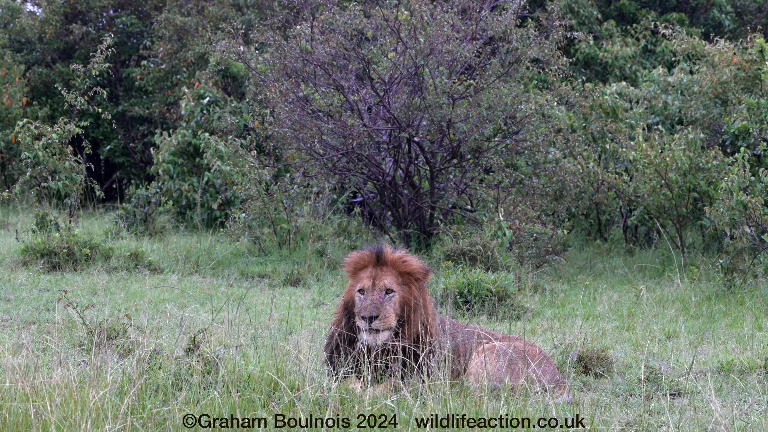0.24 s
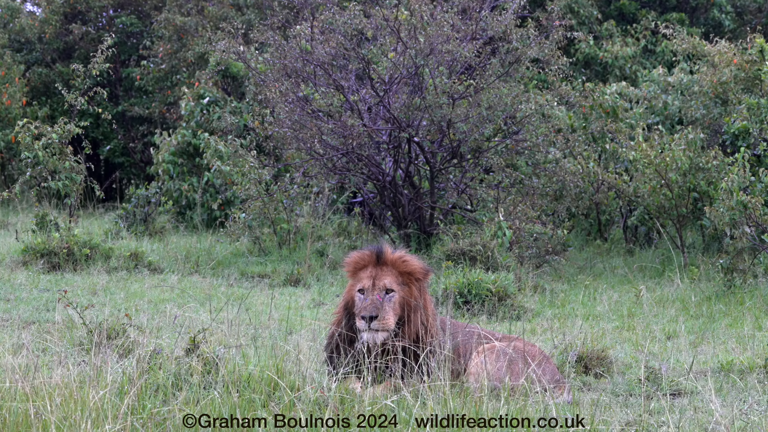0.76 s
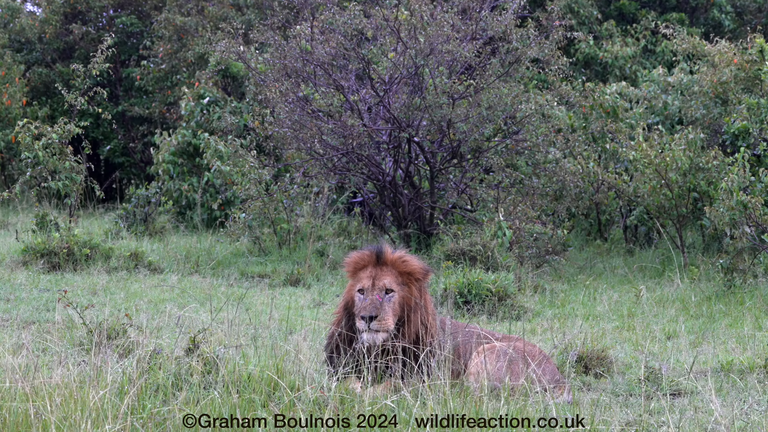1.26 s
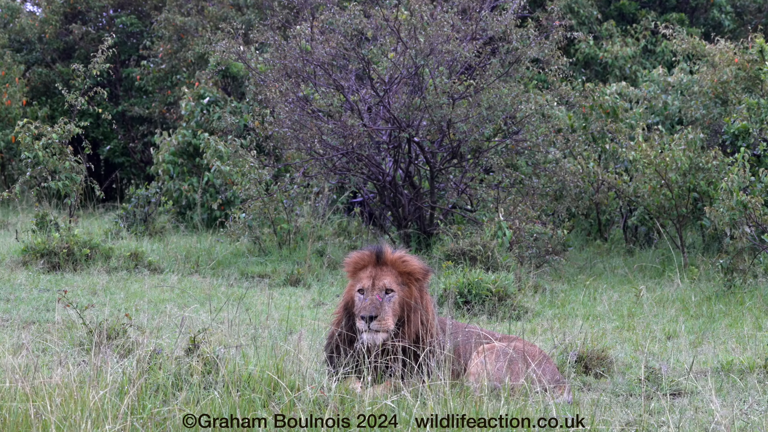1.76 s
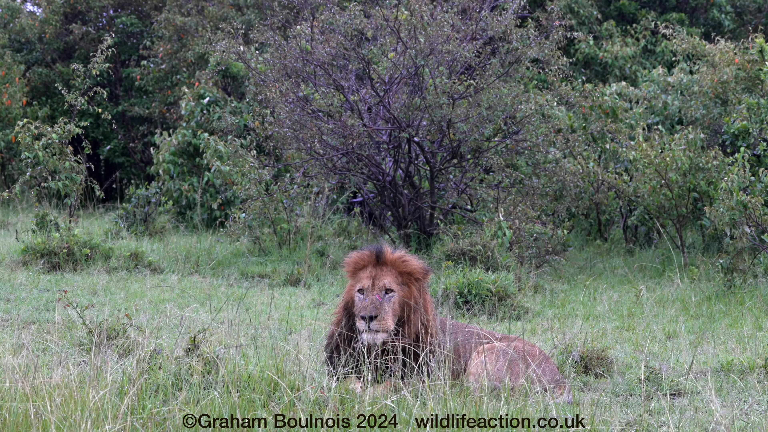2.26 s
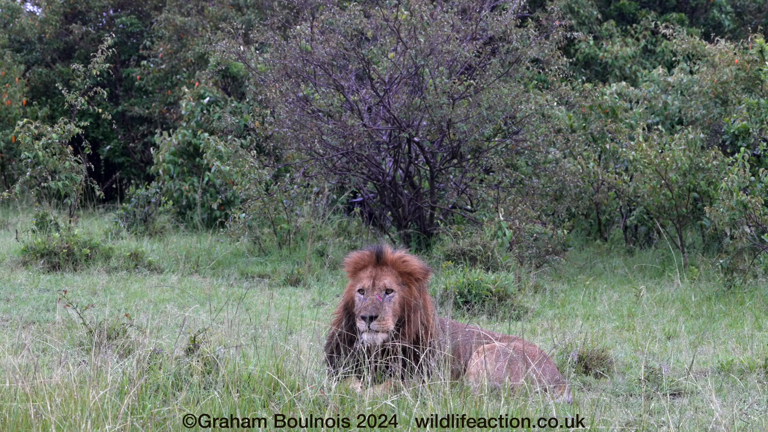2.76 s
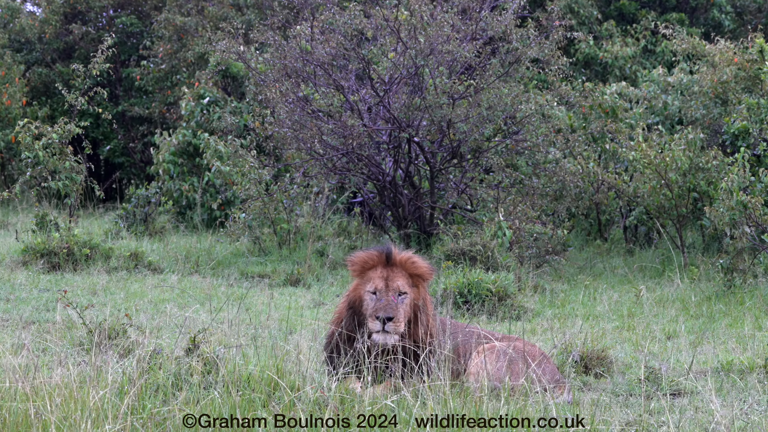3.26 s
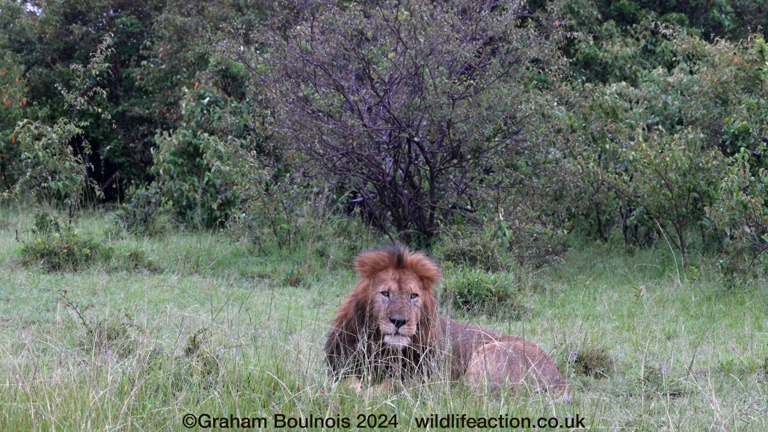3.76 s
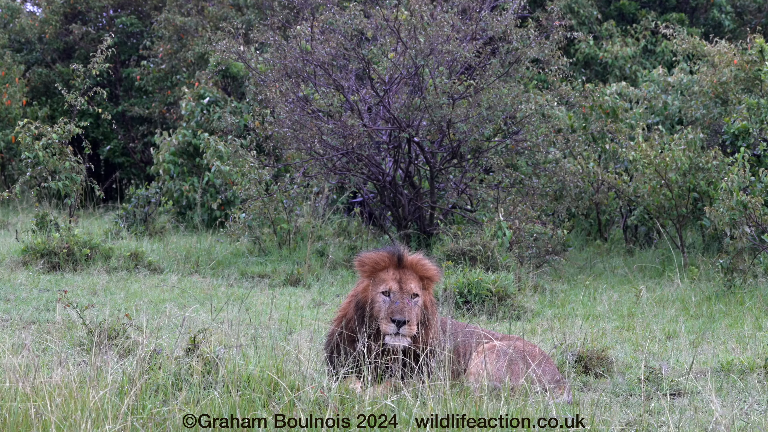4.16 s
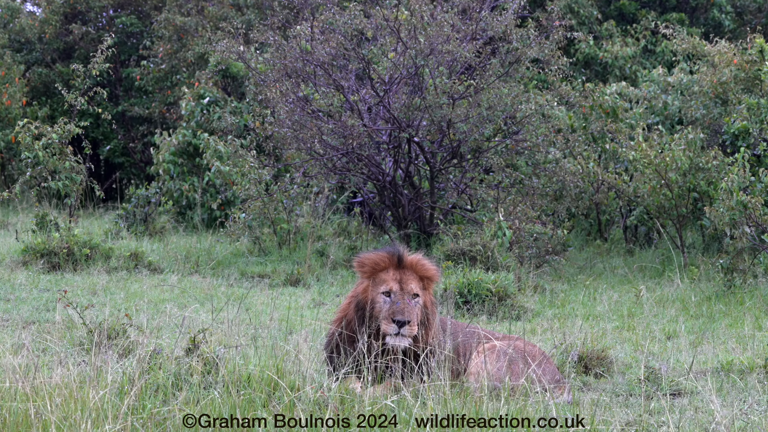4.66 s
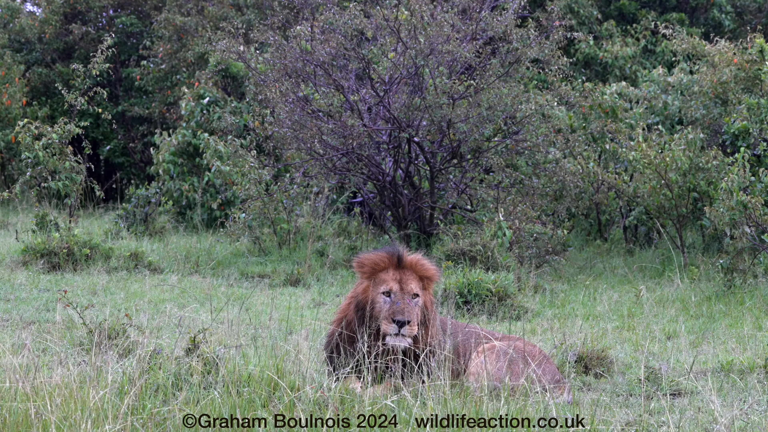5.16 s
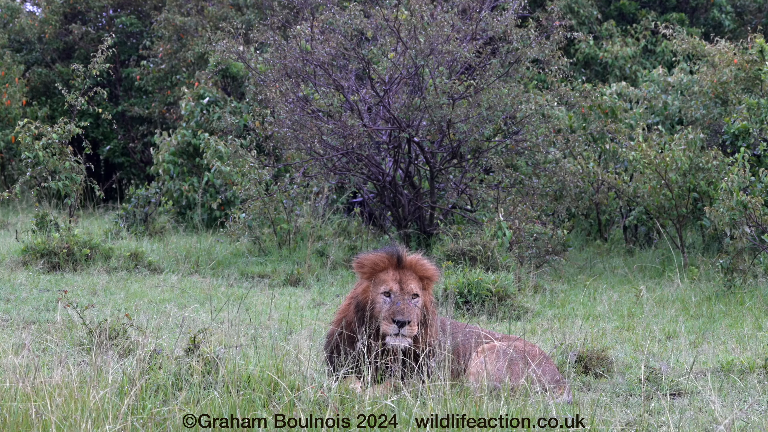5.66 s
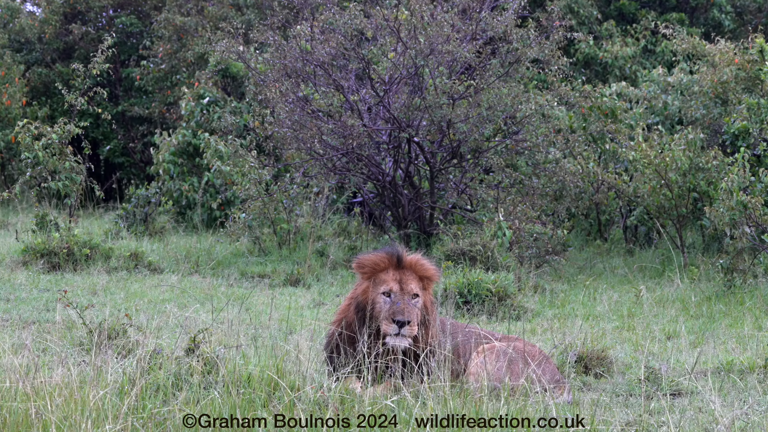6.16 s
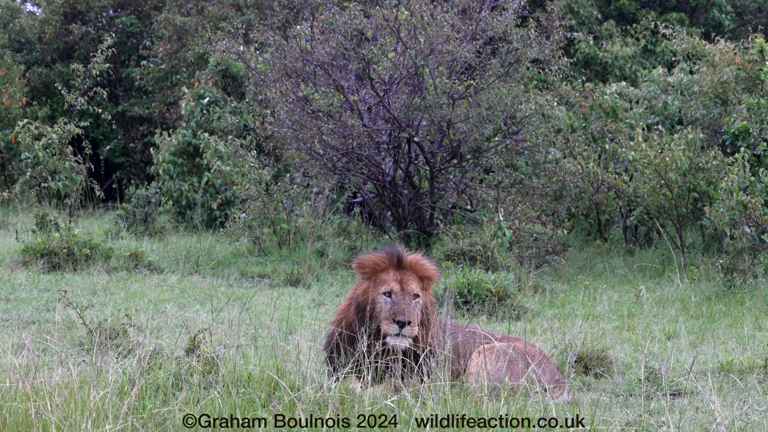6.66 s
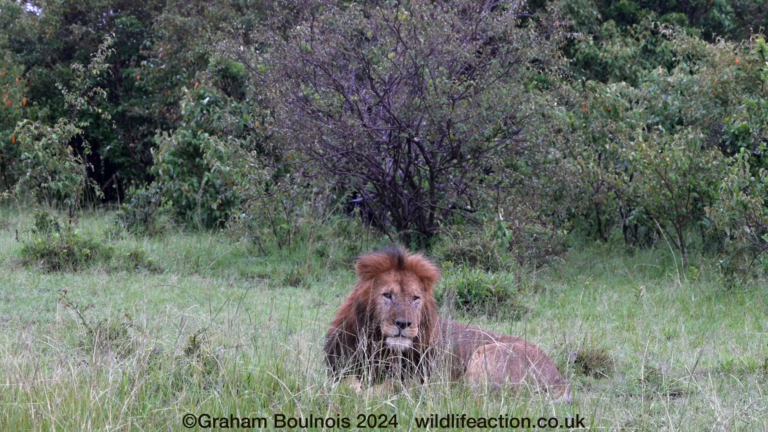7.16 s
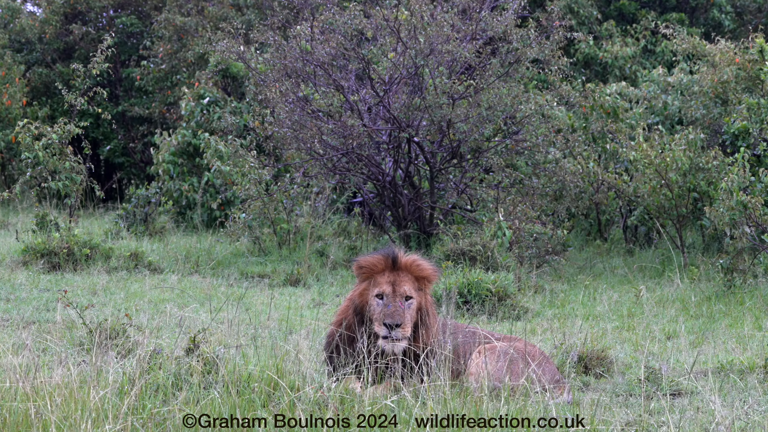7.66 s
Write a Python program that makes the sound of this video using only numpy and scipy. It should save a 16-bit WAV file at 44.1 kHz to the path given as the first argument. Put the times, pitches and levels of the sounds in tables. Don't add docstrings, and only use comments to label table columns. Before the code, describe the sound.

Outdoors beside dense bush, light rain taps leaves and plops close to the microphone. A male lion calls in deep, nearly pure notes that swell, drop in pitch and fray into throaty growling. Gaps shorten as roars become grunts, then a closing-mouth groan pulses away. Dull low echoes hang behind. Faint bird chirps, far coos and a late frog trill sit underneath. All of it is on the left channel, with only thin hiss on the right.

```python
import sys
import numpy as np
from scipy import signal
from scipy.fft import rfft, irfft
from scipy.io import wavfile
from scipy.ndimage import uniform_filter1d

SR = 44100
rng = np.random.default_rng(int(sys.argv[2]) if len(sys.argv) > 2 else 0)


def ratio(d):
    e = np.asarray(d, float) / 20
    return 10 ** e


def int16_out(signal):
    q = np.round(np.clip(np.atleast_2d(signal).T, -1, 1) * 32767)
    wavfile.write(sys.argv[1], SR, q.astype(np.int16))


N = 349255
LEAD = SR

# (frequency [Hz], density [dB per Hz])
WASH_SPECTRUM = [(15, -64), (25, -37), (49, -6.5), (96, -2), (144, -8.5), (160, -23.5), (179, -0.5),
                 (240, -12.5), (369, -12.5), (616, -15.5), (1760, -17.5), (4060, -27.5), (7340, -35),
                 (15600, -47)]
WASH_DB = -52.5
# (time [s], level [dB])
PATTER_LEVEL = [(0.0, -52.5), (1.17, -55.5), (1.56, -53.5), (2.16, -57.5), (2.98, -50.5), (3.46, -54.5),
                (3.68, -55), (4.39, -52), (4.63, -53), (4.76, -64.5), (5.271, -47), (5.6, -59), (6.13, -56),
                (6.64, -54), (6.79, -48.5), (7.92, -58.5)]
# (frequency [Hz], density [dB per Hz])
PATTER_SPECTRUM = [(290, -35), (500, -3.5), (610, 4), (1240, -7), (1750, 0.5), (3460, -5.5), (3990, -8.5),
                   (9930, -36), (15000, -28)]
# (time [s], peak level [dB], ring frequency [Hz])
NEAR_DROPS = [(0.388, -44, 3300), (0.5447, -39.5, 1450), (0.68, -42, 2600), (0.9606, -43.5, 1730),
              (1.1355, -40.5, 1430), (1.5628, -44.5, 2280), (1.7015, -38.5, 1790), (1.998, -41.5, 1740),
              (2.0718, -42, 1790), (2.347, -37.5, 1750), (2.4652, -35, 1710), (2.5902, -42.5, 1580),
              (2.863, -44.5, 1850), (2.8963, -39, 1570), (3.3, -37.5, 1318), (3.557, -42, 1530),
              (4.2768, -42, 1270), (4.9675, -39.5, 1840), (4.9887, -40.5, 1890), (5.3491, -42, 1610),
              (5.4997, -42.5, 1751), (5.754, -43.5, 1530), (5.8078, -43.5, 1980), (5.852, -42.5, 1910),
              (6.1155, -39.5, 1940), (6.404, -44.5, 1330), (6.699, -39.5, 2100), (7.0843, -41, 2190),
              (7.742, -39.5, 1810),
              (0.126, -50, 635), (0.81, -48, 781), (1.204, -48, 970), (2.189, -39.5, 970),
               (3.613, -43, 931), (3.832, -39.5, 1170), (4.133, -45, 640), (5.945, -38.5, 950),
               (6.285, -40, 1070), (7.54, -42, 883)]
# (time [s], peak level [dB])
TICKS = [(0.065, -60.5), (0.386, -73), (0.411, -63.5), (0.6485, -57.5), (0.66, -56.5), (0.7823, -63),
         (1.088, -62.5), (1.5047, -60), (2.352, -66), (2.6737, -62.5), (2.8426, -56), (2.9475, -61.5),
         (3.3037, -57), (3.6223, -64.5), (3.8945, -63), (3.971, -61.5), (4.3417, -62), (4.418, -59.5),
         (4.435, -60), (4.487, -62), (5.9379, -60.5), (6.4882, -67), (6.629, -59), (6.7216, -60.5),
         (6.739, -59.5), (7.1397, -64)]
# (start [s], length [s], first frequency [Hz], last frequency [Hz], level
# [dB])
BIRDS = [(1.379, 0.059, 4600, 3370, -66), (1.445, .035, 3300, 2480, -60.5), (1.475, .025, 3700, 3360, -59),
         (1.492, .03, 2870, 2790, -56.5), (1.555, 0.022, 3100, 2250, -59.5), (1.82, 0.073, 4400, 4130, -79),
         (2.1, .05, 4450, 4440, -78), (3.46, 0.027, 5300, 2970, -60.5), (3.466, 0.063, 6100, 5270, -73),
         (3.495, 0.019, 5380, 4270, -57), (3.52, 0.023, 5040, 4200, -66), (1.41, 0.031, 4000, 3420, -58.5),
         (3.579, 0.15, 4850, 4150, -73), (3.696, 0.041, 4080, 3870, -63), (3.85, .14, 4030, 4180, -68),
         (3.986, 0.099, 4180, 3450, -63), (4.08, 0.04, 3760, 3490, -70), (4.538, .06, 5700, 5300, -80),
         (4.586, 0.07, 5350, 4400, -69), (4.932, 0.088, 5410, 4470, -66.5), (6.63, .07, 3370, 2760, -66),
         (6.98, .06, 3570, 2990, -64), (7.016, 0.025, 4300, 4150, -58.5)]
# (start [s], length [s], first frequency [Hz], last frequency [Hz], level [dB])
DOVES = [
    (1.129, 0.085, 524, 533, -70),
    (3.73, 0.058, 708, 687, -64),
    (6.12, 0.092, 370, 365, -67),
]
# (time [s], frequency [Hz], level [dB])
FROG = [
    (6.3, 2290, -72),
    (6.4, 2220, -62),
    (6.88, 2157, -56.5),
    (6.99, 2160, -80),
    (7.1, 2190, -79),
    (7.3, 2214, -73),
    (7.45, 2190, -65),
]
# (start [s], hold [s], release [s], note level at opening [dB], growl level at opening [dB])
ROARS = [
    (-.57, .44, 0.33, -28, -48),
    (1.225, .44, .28, -31.5, -48),
    (2.825, 0.33, 0.27, -28, -40),
    (4.095, 0.14, 0.29, -26.5, -38.5),
    (5.196, .135, .29, -25.5, -40),
    (6.291, 0.1, 0.29, -26, -42),
]
ROUGHNESS = [(0, .75), (.22, .92), (.5, .97), (.66, 1), (1, 1)]
CLEAR_ROUGHNESS = [(0, .12), (.19, .15), (.26, .85), (.6, .95), (.72, 1), (1, 1)]
# (multiple of the note [1], level [dB])
OVERTONES = [(2, 1), (3, 3.5), (4, -5.5), (5, -1.5), (6, -16)]
# (frequency [Hz], width [Hz], level [dB])
THROAT = [(257.3, 15.4, 2.5), (370, 34.3, -3), (432.5, 40, -1.5), (500, 60, -8.5), (572.2, 32, -4),
          (635, 31, -7.5), (754.4, 35.5, -11), (837.7, 34.7, -11), (973, 58, -19)]
# (time [s], level [dB], frequency [Hz])
FLARES = [(0.052, -37, 510), (0.148, -46, 390), (0.072, -42.5, 155.8), (1.825, -49, 849), (1.917, -45, 480),
          (1.949, -49, 150.4), (1.969, -48, 452), (3.272, -42.5, 513), (3.354, -49.5, 499),
          (3.354, -36, 152), (3.418, -44, 475), (3.423, -48.5, 153), (4.394, -36, 145.9), (4.419, -39, 389),
          (4.45, -37.5, 144.5), (4.493, -48.5, 477), (6.524, -45, 526), (6.571, -32, 169)]
# (time [s], frequency [Hz], level [dB])
WHINE = [
    (1.38, 440.6, -58),
    (1.45, 472.5, -42.5),
    (1.55, 477, -38.5),
    (1.66, 471.5, -35.5),
    (1.72, 438, -44),
    (1.76, 408, -42),
]
# (time [s], level [dB])
GROAN = [
    (6.62, -50.5),
    (6.694, -46),
    (6.818, -38.5),
    (6.85, -43.5),
    (6.964, -44.5),
    (6.998, -50),
    (7.036, -47),
    (7.378, -50),
    (7.5, -66.5),
]
# (time [s], low [Hz], middle [Hz], high [Hz])
MOUTH = [
    (6.6, 198, 633, 1040),
    (6.8, 215, 599, 912),
    (7.001, 201.4, 445, 796),
    (7.04, 185, 500, 833),
    (7.5, 90, 500, 715),
]
# (time [s], level [dB], frequency [Hz], half length [s])
THROBS = [(7.065, -42.5, 347, 0.025), (7.105, -39, 342.4, 0.013), (7.142, -36.5, 324.3, 0.018),
          (7.178, -32, 333, 0.011), (7.199, -35, 323, 0.0091), (7.214, -42, 350.6, .014),
          (7.252, -32, 351, 0.026), (7.314, -29.5, 331.7, 0.032), (7.37, -35.5, 333, 0.016),
          (7.387, -37.5, 338.5, 0.019), (7.448, -44, 327, 0.023)]

SNAP_DB, SNAP_S = -11.5, 0.0082
CRACKLE_PER_S, CRACKLE_DB, CRACKLE_S = 45, -60, 0.0044
NOTE_PEAK, NOTE_ENDS_DB = .6, 2
WAVER_DB, WAVER_HZ = 3, 7.9
FLARE_S = 0.019
RISE_S, RISE_DB, RISE_BEND = .09, 45, 1.7
PITCH_HZ, SCOOP, SCOOP_S, SAG, SAG_S = 178.43, .22, .045, .16, .045
SCOOP_PER_HOLD = .1
STRAIN, SNAPPED, FRAYED = .16, .65, .85
BREAK_DB, NOTE_FALL_DB, NOTE_BEND = -28.5, 38, 1.18
GROWL_DB, GROWL_RISE_DB, GROWL_FALL_DB, GROWL_BEND = -38, 30, 35, 2.45
CHEST_DB, CHEST_LIFT_DB, CHEST_LEAD_S, CHEST_FALL_DB = -51, 20.5, 0.083, 12
OPEN_HZ, SHUT_HZ = 200, 105
LOW_DB, HIGH_DB, RUMBLE_DB = -8.5, -11, -25.5
SHUT_LOW_DB, SHUT_RUMBLE_DB = 18, 28.5


def evened(x):
    return x / np.sqrt(np.mean(x ** 2) + 1e-20)


def read(points, hz):
    f, value = np.transpose(points)
    return np.interp(np.log(hz + 1), np.log(f + 1), value)


def add(mix, s, sound):
    part = mix[max(round(s * SR), 0):][:len(sound)]
    part += sound[:len(part)]


def columns(rows):
    s, *cols = np.transpose(rows)
    t = np.arange(s[0], s[-1], 1 / SR)
    edge = signal.windows.tukey(len(t), min(1, 600 / len(t)))
    return t, edge, [np.interp(t, s, c) for c in cols]


def tone(hz):
    return np.sin(2 * np.pi * np.cumsum(hz) / SR)


def decay(count, t60):
    return ratio(-60 * np.arange(count) / SR / t60)


def resonate(x, hz, width):
    turn = np.exp(2j * np.pi * np.cumsum(hz * np.ones(len(x))) / SR)
    r = np.exp(-np.pi * width / SR)
    return 2 * (turn * signal.lfilter([1 - r], [1, -r], x / turn + 1e-18)).real


def steady(x, s):
    size = round(s * SR)
    power = uniform_filter1d(uniform_filter1d(x ** 2, size), size)
    return x / np.sqrt(power + 1e-20)


def drift(count, hz):
    noise = rng.standard_normal(count + 4000)
    return evened(signal.lfilter(*signal.butter(2, hz, fs=SR), noise)[4000:])


def wash():
    frames, hz = N // 128 + 9, np.fft.rfftfreq(512, 1 / SR)
    a, b, patches = rng.standard_normal((frames, 257, 3)).T
    patches = evened(uniform_filter1d(uniform_filter1d(patches, 10, 0), 8, 1))
    flicker = evened(uniform_filter1d(rng.standard_normal(frames), 14))
    swing_db = (2.0 * patches + 3.4 * flicker) / (1 + (hz[:, None] / 6000) ** 4)
    fine = signal.istft((a + 1j * b) * ratio(swing_db), nperseg=512, noverlap=384)[1][:N]
    tilt = ratio(read(WASH_SPECTRUM, np.fft.rfftfreq(N, 1 / SR)))
    return ratio(WASH_DB - 7.5) * evened(irfft(rfft(fine) * tilt, N))


def crackle():
    size = ratio(4.0 * np.minimum(rng.exponential(1, N), 3)) * (rng.random(N) < CRACKLE_PER_S / SR)
    spray = rng.standard_normal(N) * signal.oaconvolve(size, decay(600, CRACKLE_S))[:N]
    return ratio(CRACKLE_DB) * resonate(resonate(spray, 3000, 4200), 3000, 5200)


def splash(hz, t60):
    t = np.arange(2200) / SR
    ring = np.sin(2 * np.pi * hz * (t - 12 * t ** 2)) * ratio(-60 * t / t60)
    ring *= 1 - np.exp(-(2.0 * t * hz) ** 2)
    spray = resonate(resonate(rng.standard_normal(len(t)), hz, 1.14 * hz), hz, 0.67 * hz)
    return ring + .5 * spray * ratio(-60 * t / 0.11) * (1 - np.exp(-(.5 * t * hz) ** 2))


def patter():
    size = ratio(3.66 * np.minimum(rng.exponential(1, N), 2.8)) * (rng.random(N) < 220 / SR)
    kind, out = rng.integers(0, 24, N), np.zeros(N)
    for k, hz in enumerate(np.geomspace(900, 6500, 24)):
        weight = np.sqrt(hz) * ratio(read(PATTER_SPECTRUM, hz))
        out += weight * signal.oaconvolve(size * (kind == k), splash(hz, 14 / hz))[:N]
    dull = signal.lfilter(*signal.butter(3, 7000, fs=SR), out)
    s, db = np.transpose(PATTER_LEVEL)
    return ratio(np.interp(np.arange(N) / SR, s, db) - 10.5) * evened(dull)


def rain():
    out = patter()
    for s, db, hz in NEAR_DROPS:
        add(out, s, ratio(db) * splash(hz, 0.0073))
        snap = resonate(rng.standard_normal(900), 0.93 * hz, 0.9 * hz)
        add(out, s, ratio(db + SNAP_DB) * decay(900, SNAP_S) * snap)
    for s, db in TICKS:
        tick = resonate(resonate(rng.standard_normal(900), 6500, 9700), 6500, 9700)
        add(out, s, ratio(db - 5) * tick * decay(900, 0.027))
    return out


def whistle(s, length, first_hz, last_hz, top_db):
    peak_hz = first_hz + NOTE_PEAK * (last_hz - first_hz)
    t, edge, (hz, db) = columns([(s, first_hz, top_db - NOTE_ENDS_DB),
                                 (s + NOTE_PEAK * length, peak_hz, top_db),
                                 (s + length, last_hz, top_db - NOTE_ENDS_DB / 2)])
    level = ratio(db + 0.5 + 3.3 * drift(len(t), 100))
    return t[0], edge * level * tone(hz * (1 + .012 * drift(len(t), 150)))


def frog():
    t, edge, (hz, db) = columns(FROG)
    trill = np.maximum(0.42 + np.sin(2 * np.pi * 24 * t + 1.6 * drift(len(t), 5.3)), 0)
    return t[0], edge * ratio(db - 3.0) * evened(trill) * tone(hz * (1 + 0.0171 * drift(len(t), 73)))


def whistlers():
    out = np.zeros(N)
    for s, sound in [whistle(*row) for row in BIRDS + DOVES] + [frog()]:
        add(out, s, sound)
    leaves = rng.standard_normal(6000) * decay(6000, 0.59)
    return out + ratio(-5.5) * signal.oaconvolve(out, leaves / np.linalg.norm(leaves))[:N]


def bush(voice):
    t = np.arange(2 * SR) / SR
    taps = rng.standard_normal(len(t)) * (rng.random(len(t)) < 90 / SR)
    tail = taps * (1 - np.exp(-(t / 0.32) ** 2)) * ratio(-60 * t / 3.4)
    tail = signal.lfilter(*signal.butter(3, 240, fs=SR), tail)
    tail /= abs(rfft(tail)[300:420]).mean()
    waver = ratio(-28 + WAVER_DB * drift(len(voice), WAVER_HZ))
    return waver * signal.fftconvolve(voice, tail)[:len(voice)]


def hoarse(breath, hz, width_hz):
    return steady(resonate(resonate(breath, hz, width_hz), hz, 3.5 * width_hz), 0.084)


def groan():
    t, edge, (mid_db,) = columns(GROAN)
    s, *bands = np.transpose(MOUTH)
    low, mid, high = (np.interp(t, s, c) for c in bands)
    shut = np.clip((OPEN_HZ - low) / (OPEN_HZ - SHUT_HZ), 0, 1)
    low_db = mid_db + LOW_DB + SHUT_LOW_DB * shut
    rumble_db = mid_db + RUMBLE_DB + SHUT_RUMBLE_DB * shut
    breath = rng.standard_normal(len(t)) * ratio(2.0 * drift(len(t), 41.1))
    middle = hoarse(breath, mid, 31) + 1.04 * hoarse(breath, .84 * mid, 30) + 0.39 * hoarse(breath, 331, 32)
    sound = ratio(low_db) * hoarse(breath, low, 21) + ratio(mid_db - 4.5) * middle
    sound += ratio(mid_db + HIGH_DB) * hoarse(breath, high, 55) + ratio(rumble_db) * hoarse(breath, 82, 30)
    return t[0], edge * sound


def whine():
    t, edge, (hz, db) = columns(WHINE)
    throb = 1 + 0.44 * tone(29 * (1 + 0.18 * drift(len(t), 8.9)))
    return t[0], edge * ratio(db + 2) * throb * tone(hz * (1 + 0.015 * drift(len(t), 25)))


def effort(start, hold, release, open_db, growl_open_db):
    t = np.arange(0, RISE_S + hold + release, 1 / SR)
    shy = np.clip(1 - t / RISE_S, 0, 1) ** RISE_BEND
    since = t - RISE_S - hold
    held, spent = np.clip(1 + since / hold, 0, 1), np.clip(since / release, 0, 1)
    slipped = np.clip(since / SAG_S, 0, 1)
    hz = PITCH_HZ * (1 - SCOOP * np.exp(-t / (SCOOP_S + SCOOP_PER_HOLD * hold)) - SAG * slipped)
    broken = STRAIN * held ** 3 + (SNAPPED - STRAIN) * slipped + (FRAYED - SNAPPED) * spent
    note_db = open_db + (BREAK_DB - open_db) * held
    note_db -= RISE_DB * shy + NOTE_FALL_DB * spent ** NOTE_BEND
    growl_db = growl_open_db + (GROWL_DB - growl_open_db) * held
    growl_db -= GROWL_RISE_DB * shy + GROWL_FALL_DB * spent ** GROWL_BEND
    chest_db = CHEST_DB - CHEST_LIFT_DB * np.clip(-since / CHEST_LEAD_S, 0, 1) - CHEST_FALL_DB * spent ** 3
    edge = signal.windows.tukey(len(t), 600 / len(t))
    return start + t, edge, (note_db, hz, growl_db, chest_db, broken)


def roar(row, roughness):
    t, edge, (note_db, hz, growl_db, chest_db, broken) = effort(*row)
    n = len(t)
    rough = np.interp(np.arange(n) / n, *np.transpose(roughness))
    turns = np.cumsum(hz * (1 + .006 * drift(n, 22))) / SR
    beat = tone((30 - 8.2 * broken) * (1 + 0.205 * drift(n, 11.2)))
    flutter = ratio((1.5 + 4.7 * broken) * beat)
    slaps = np.diff(np.floor(turns * 2), prepend=0) * rng.standard_normal(n)
    chaos = evened(flutter * (evened(slaps) + 1.27 * rng.standard_normal(n)))

    sine = np.sqrt(2) * np.sin(2 * np.pi * turns)
    ring = steady(resonate(resonate(chaos, hz, 85), hz, 87), 0.071)
    note = np.sqrt(1 - broken) * sine + np.sqrt(broken) * ring

    stack = evened(sum(ratio(db) * np.cos(2 * np.pi * k * turns) for k, db in OVERTONES))
    throat = np.zeros(n)
    for k, (f, width, db) in enumerate(THROAT):
        throat += (-1) ** k * ratio(db) * resonate(resonate(chaos, f, width), f, 1.74 * width)
    growl = np.sqrt(1 - rough) * stack + np.sqrt(rough) * steady(throat, 0.033)

    chest = steady(resonate(resonate(chaos, 82, 25), 74, 40), 0.021)
    return t[0], edge * (ratio(note_db) * note + ratio(growl_db) * growl + ratio(chest_db) * chest)


def lion():
    out = np.zeros(N + LEAD)
    folds = [ROUGHNESS, CLEAR_ROUGHNESS] + 4 * [ROUGHNESS]
    calls = [roar(*call) for call in zip(ROARS, folds)]
    for s, sound in calls + [whine(), groan()]:
        add(out, s + LEAD / SR, sound)
    t = np.arange(-2205, 2205) / SR
    for s, db, hz, half in [(*row, FLARE_S) for row in FLARES] + THROBS:
        burst = np.exp(-(t / half) ** 2) * np.sin(2 * np.pi * hz * (t + s))
        add(out, s + t[0] + LEAD / SR, ratio(db + 4.0) * burst)
    return out


def scene():
    voice = lion()
    heard = (voice + bush(voice))[LEAD:] + wash() + rain() + whistlers() + crackle()
    return np.array([2 * heard, 0 * heard])


def band_limit(x):
    return signal.sosfilt(signal.butter(12, 15730, fs=SR, output="sos"), x)


def record(dry):
    hiss = ratio(np.array([[-75], [-74.5]])) * rng.standard_normal(dry.shape)
    hiss[1] += ratio(-96) * np.sin(2 * np.pi * 50 * np.arange(N) / SR)
    return band_limit(dry + hiss)


dry = scene()
out = record(dry)
int16_out(out)
```